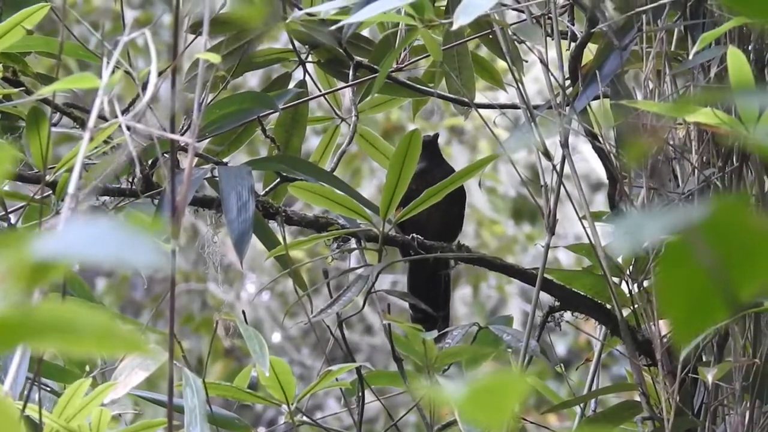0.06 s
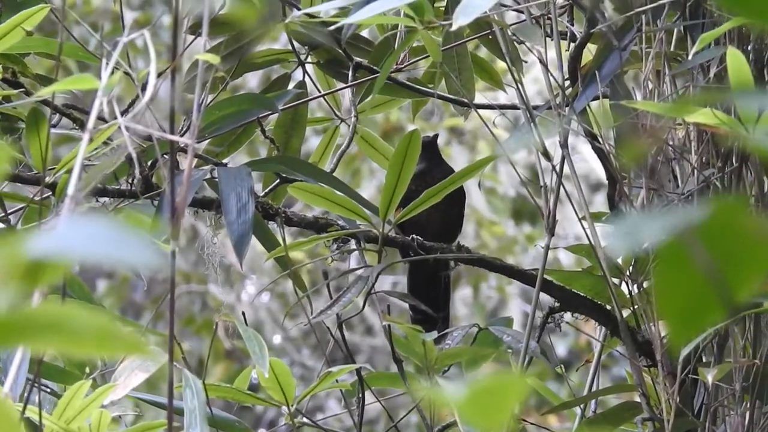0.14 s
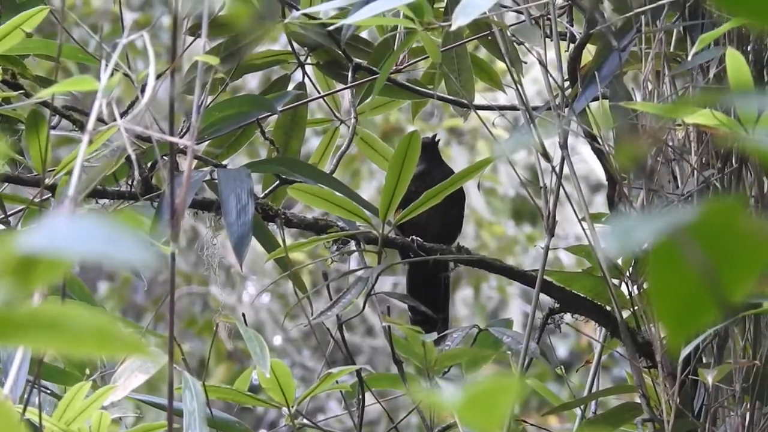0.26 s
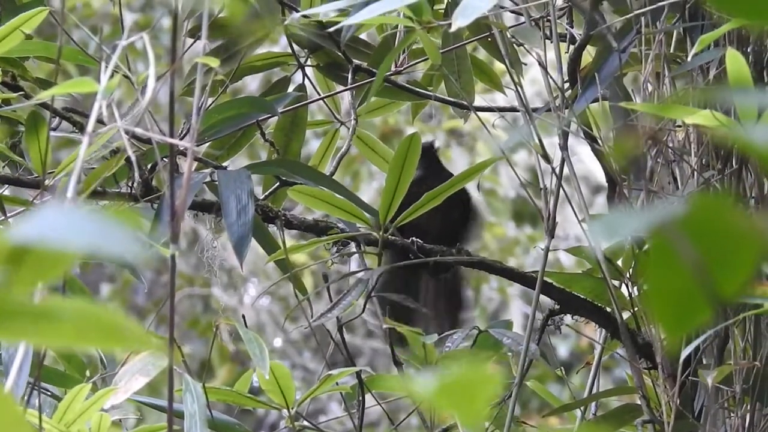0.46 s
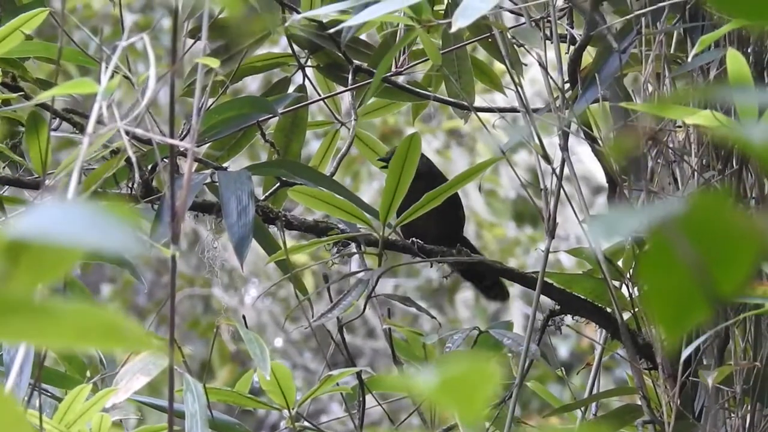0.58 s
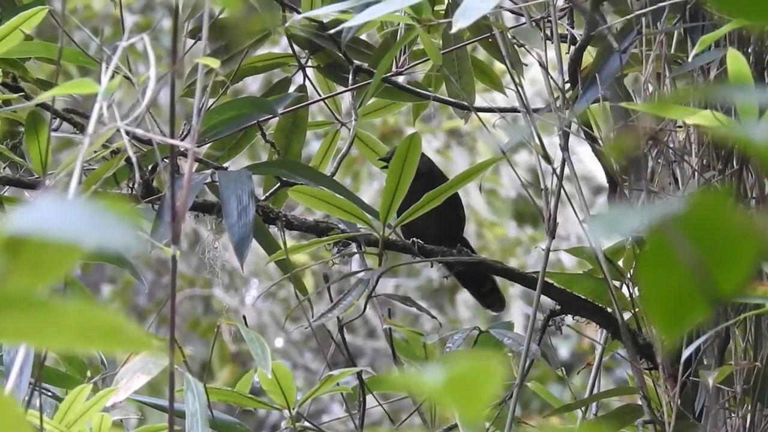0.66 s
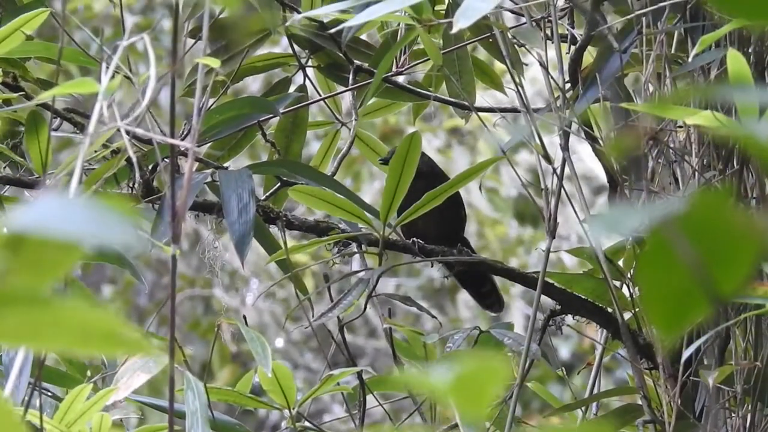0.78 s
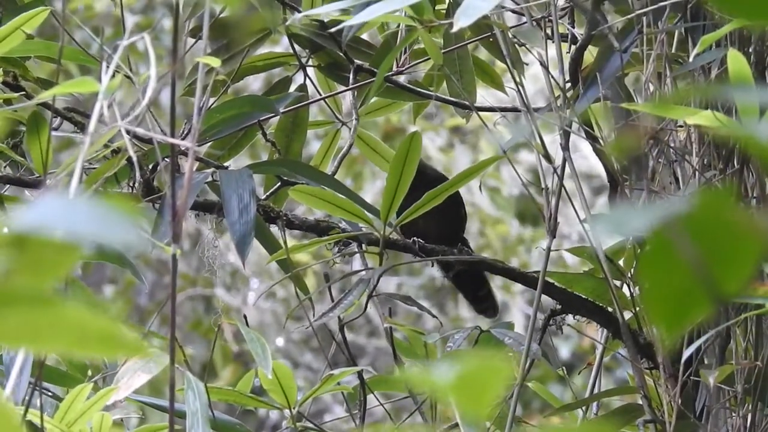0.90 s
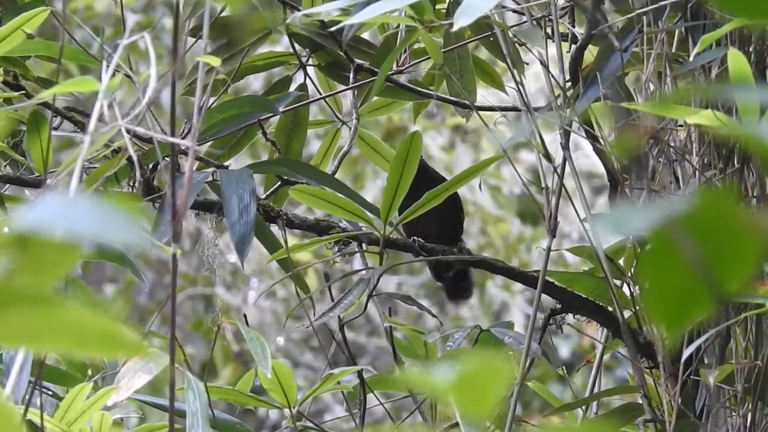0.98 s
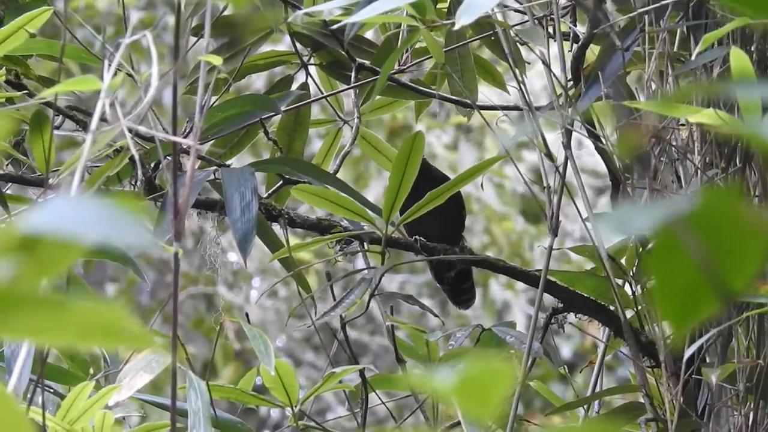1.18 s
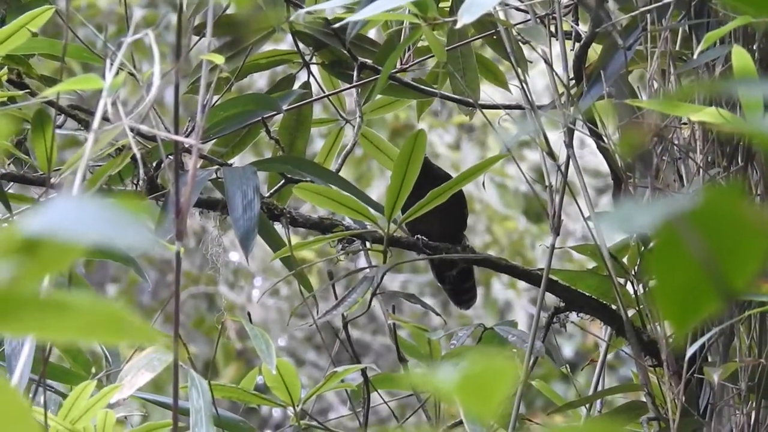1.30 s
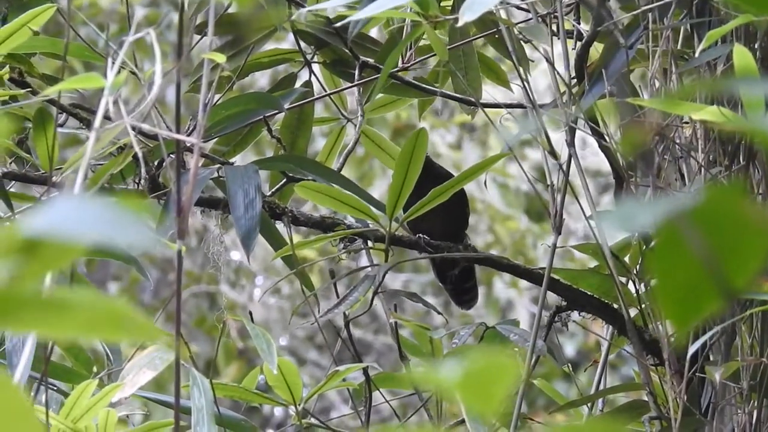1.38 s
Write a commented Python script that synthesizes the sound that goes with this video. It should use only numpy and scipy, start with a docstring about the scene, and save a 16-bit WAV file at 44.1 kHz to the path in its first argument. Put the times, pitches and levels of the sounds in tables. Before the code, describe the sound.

A bird scolds with harsh, buzzy, rattling rasps of uneven length in echoing dense forest

```python
"""Dense forest: a laughingthrush scolds from a branch. Each rasp is two whistles, one from each side of the
syrinx, swept up and down nearly eighty times a second; the upper one flares as it crosses the throat resonance.
Soft hoarse slurs, also sines on pitch curves, fall between some rasps. Decaying noise echoes scatter the calls
off leaves and trees. Shaped noise makes a faint hiss, a low rumble and thin high air."""
import sys
import numpy as np
from scipy import signal
from scipy.fft import rfft, irfft
from scipy.io import wavfile

SR = 44100
rng = np.random.default_rng(int(sys.argv[2]) if len(sys.argv) > 2 else 0)


def to_wav(s):
    """Save 16-bit WAV."""
    ch = np.atleast_2d(s).T  # columns
    pcm = np.round(np.clip(ch, -1, 1) * 32767)  # PCM
    wavfile.write(sys.argv[1], SR, pcm.astype(np.int16))


N = 63945
LEAD_S = 0.2   # run-in ahead of time 0, trimmed in scene()
LEAD = int(LEAD_S * SR)
TIME_S = np.arange(-LEAD, N) / SR


def from_db(db):
    """Decibels to amplitude gain."""
    return 10 ** (np.asarray(db) / 20)


def at_hz(points, hz):
    """Read a spectrum in dB, interpolated on a log-frequency axis."""
    point_hz, point_db = np.transpose(points)
    return np.interp(np.log(np.maximum(hz, 1)), np.log(point_hz), point_db)


ROUGH_HZ, LEVEL_ROUGH_DB = 900, 1.3
WANDER_HZ, WANDER_PITCH, WANDER_DB = 60, 0.018, 0.9   # WANDER_PITCH: fraction of pitch


def flutter(rate_hz):
    """Random unsteadiness of the syrinx: low-passed noise, standard deviation 1."""
    lowpass = signal.butter(2, rate_hz, fs=SR, output="sos")
    y = signal.sosfilt(lowpass, rng.standard_normal(len(TIME_S)))
    return y / y.std()


def whistle(hz, rough):
    """A sine on a pitch curve, with fast roughness and slower wander in pitch and level."""
    unsteady_hz = hz * (1 + rough * flutter(ROUGH_HZ) + WANDER_PITCH * flutter(WANDER_HZ))
    phase = 2 * np.pi * np.cumsum(unsteady_hz) / SR
    level_db = LEVEL_ROUGH_DB * flutter(ROUGH_HZ) + WANDER_DB * flutter(WANDER_HZ)
    return np.sin(phase) * from_db(level_db)


EDGE_S = 0.00085


def gate(start_s, end_s):
    """Open between two times, with short sine-squared edges."""
    to_edge_s = np.minimum(TIME_S - start_s, end_s - TIME_S)
    return np.sin(np.pi / 2 * np.clip(to_edge_s / EDGE_S, 0, 1)) ** 2


SWEEP_S = 0.0129
RISE_SKEW = 0.35   # each sweep rises faster than it falls


def swing(t_s, first_s, last_s, slowing_sweeps):
    """Sweep cycle of the syrinx: 0 at each pitch dip, 1 at each crest."""
    along = (t_s - first_s) / (last_s - first_s)
    sweeps = np.round((last_s - first_s) / SWEEP_S)
    turn = 2 * np.pi * (sweeps * along + slowing_sweeps * (1 - (2 * along - 1) ** 2))
    return (1 - np.cos(turn + RISE_SKEW * (1 - np.cos(turn)))) / 2


UPPER_DIP_HZ, OPENING_DIP_HZ, OPENING_S = 4850, 5450, 0.01151
UPPER_TOP_HZ, SOFT_TOP_HZ = 9200, 7925   # soft: before the rasp has swelled
UPPER_ROUGH = 0.016   # fraction of pitch

# Gain of the upper whistle through the throat: (distance from resonance [octaves], gain [dB])
THROAT_GAIN = [(-.45, -8), (-.25, -42), (-.11, -2.5), (0, -1.5), (0.089, -1.5), (.2, -25.5), (.4, -20.5),
               (.62, -25), (.75, -37)]


def upper_whistle(height, since_first_s, softness, throat_hz):
    """Upper side of the syrinx: the throat resonance turns its sweeps into level flares."""
    opening = np.exp(-(np.maximum(since_first_s, 0) / OPENING_S) ** 2)
    dip_hz = UPPER_DIP_HZ + (OPENING_DIP_HZ - UPPER_DIP_HZ) * opening
    top_hz = UPPER_TOP_HZ + (SOFT_TOP_HZ - UPPER_TOP_HZ) * softness
    hz = dip_hz * (top_hz / dip_hz) ** height
    gain_db = np.interp(np.log2(hz / throat_hz), *np.transpose(THROAT_GAIN))
    return whistle(hz, UPPER_ROUGH) * from_db(gain_db)


LOWER_DIP_HZ, LOWER_TOP_HZ, LOWER_DB = 2450, 5200, -12
LOWER_LAG_S = 0.000803   # behind the upper whistle
LOWER_SHAPE = 0.85   # below 1: sharper turns at the dips
LOWER_ROUGH = 0.032   # fraction of pitch
LEAD_IN_DB, LEAD_IN_FADE_DB = 3, 10.5   # first sweep, fading as it climbs
ACCENT_AT_S, ACCENT_WIDTH_S, ACCENT_SHARPNESS = 0.0062, 0.0022, 4

# Gain of the lower whistle: (frequency [Hz], gain [dB])
LOWER_GAIN = [(2200, -11.5), (2500, -13.5), (3100, 1.5), (3800, -5.5), (4500, -3), (5200, -5)]


def lower_whistle(lagged_swing, since_first_s, accent_db):
    """Lower side of the syrinx: level follows its pitch, and the rasp's first crest is accented."""
    height = lagged_swing ** LOWER_SHAPE
    hz = LOWER_DIP_HZ + (LOWER_TOP_HZ - LOWER_DIP_HZ) * height
    lead_in_db = (LEAD_IN_DB - LEAD_IN_FADE_DB * height) * (since_first_s < -SWEEP_S / 4)
    accent_window = np.exp(-((since_first_s - ACCENT_AT_S) / ACCENT_WIDTH_S) ** 2)
    crest_db = accent_db * height ** ACCENT_SHARPNESS * accent_window
    return whistle(hz, LOWER_ROUGH) * from_db(LOWER_DB + at_hz(LOWER_GAIN, hz) + lead_in_db + crest_db)


# Rasps: (first pitch dip [s], last pitch dip [s], overhang after it [s], slowing [sweeps],
#         throat resonance [Hz], level [dB], swell time [s], swell depth [dB], opening accent [dB])
RASP_CALLS = [(-.095, -0.031, 0.0011, 0.0038, 5920, -14.5, .02, -2.5, -5),
              (0.3276, 0.4781, 0.004, .16, 5940, -12, .085, 14, 9.5),
              (0.5277, .5422, 0.0011, 0.00063, 5850, -10, .01, 1, 8),
              (0.5849, 0.5961, 0.0023, 0.0029, 5910, -10, .01, 1.5, 10.5),
              (0.6851, .762, 0.00044, 0.022, 5757, -15, 0.013, 1, 16.5),
              (0.9046, 1.0455, 0.00064, 0.02, 5770, -13.5, 0.1, 9.5, 14),
              (1.130, 1.21, 0.00024, 0, 5690, -15.5, 0.027, 2, 16.5)]


def rasp(first_s, last_s, overhang_s, slowing_sweeps, throat_hz, level_db, swell_s, swell_db, accent_db):
    """Both sides of the syrinx swing over about an octave; the lower starts about one sweep early."""
    since_first_s = TIME_S - first_s
    softness = np.clip(1 - since_first_s / swell_s, 0, 1)
    height = swing(TIME_S, first_s, last_s, slowing_sweeps)
    lagged_swing = swing(TIME_S - LOWER_LAG_S, first_s, last_s, slowing_sweeps)
    end_s = last_s + overhang_s
    upper = upper_whistle(height, since_first_s, softness, throat_hz) * gate(first_s - 0.004, end_s)
    lower = lower_whistle(lagged_swing, since_first_s, accent_db) * gate(first_s - 0.015, end_s - 0.002)
    return from_db(level_db - swell_db * softness) * (upper + lower)


NOTE_ROUGH = 0.07   # fraction of pitch

# Soft slurs: (start [s], length [s], start pitch [Hz], middle pitch [Hz], end pitch [Hz], level [dB])
SLURS = [(0.189, 0.0027, 3170, 2450, 3700, -31.5), (.196, 0.02, 3847, 4600, 4210, -35),
         (.198, 0.019, 7010, 5900, 6500, -31), (.208, 0.0089, 3350, 2450, 4370, -41),
         (.217, 0.02, 7380, 6200, 7100, -26), (.223, 0.0135, 8950, 6700, 5450, -38),
         (.223, .010, 5410, 4287, 3300, -31.5), (.884, 0.0069, 5880, 6430, 7500, -29.5)]


def note(start_s, length_s, start_hz, middle_hz, end_hz, level_db):
    """One soft, hoarse slur: a rough whistle on a parabola through three pitches."""
    along = np.clip((TIME_S - start_s) / length_s, 0, 1)
    parabola = np.polyfit([0, 0.5, 1], [start_hz, middle_hz, end_hz], 2)
    hz = np.polyval(parabola, along)
    return from_db(level_db) * gate(start_s, start_s + length_s) * whistle(hz, NOTE_ROUGH)


VOICE_BAND_HZ = (2200, 9500)


def voice_band(x):
    """Band-pass to the range the bird radiates."""
    return signal.sosfilt(signal.butter(9, VOICE_BAND_HZ, "band", fs=SR, output="sos"), x)


OCTAVE_DB = -48


def with_octave(x):
    """Add a faint second harmonic: same envelope, doubled phase."""
    z = signal.hilbert(x)
    return x + from_db(OCTAVE_DB) * np.abs(z) * np.cos(2 * np.angle(z))


def coloured(x, points):
    """Shape noise by a spectrum; rms 1."""
    hz = np.fft.rfftfreq(x.shape[-1], 1 / SR)
    y = irfft(rfft(x) * from_db(at_hz(points, hz)), x.shape[-1])
    return y / y.std()


def stereo_noise(size, likeness):
    """White noise; likeness is the correlation between the two channels."""
    mid, side = rng.standard_normal((2, size))
    c = np.clip(likeness, 0, 1)
    return (np.sqrt(1 + c) * mid + np.sqrt(1 - c) * side * np.array([[1], [-1]])) / np.sqrt(2)


LEAF_DB, LEAF_T60_S, LEAF_DELAY_S, LEAF_LIKENESS = -3.5, 0.14, 0.003, 0.7


def leaf_echo(t_s):
    """Quick scatter from nearby leaves: delayed noise, decaying exponentially."""
    decay = from_db(-60 * t_s / LEAF_T60_S)
    return stereo_noise(len(t_s), LEAF_LIKENESS) * decay * (t_s > LEAF_DELAY_S)


FOREST_DB, FOREST_T60_S, FOREST_BUILD_S, FOREST_LIKENESS = -5.5, 0.61, 0.0062, 0.35

# Colour of the trees' tail: (frequency [Hz], relative level [dB])
TREE_COLOUR = [(2000, -4.5), (3200, -5.5), (4400, 8.5), (5800, -3), (7000, 5.5), (9000, 1.5)]


def tree_echo(t_s):
    """Longer, wider tail from the trees: coloured noise that builds up, then decays."""
    decay = from_db(-60 * t_s / FOREST_T60_S)
    build = 1 - np.exp(-t_s / FOREST_BUILD_S)
    return coloured(stereo_noise(len(t_s), FOREST_LIKENESS), TREE_COLOUR) * decay * build


def forest(call):
    """Convolve the call with both echoes, each set to its level by energy per channel."""
    t_s = np.arange(SR) / SR
    echoes = 0
    for db, echo in ((LEAF_DB, leaf_echo(t_s)), (FOREST_DB, tree_echo(t_s))):
        echoes = echoes + from_db(db) * echo / np.sqrt(np.sum(echo ** 2) / 2)
    return signal.fftconvolve(call[None], echoes, axes=1)[:, :len(call)]


HISS_DB, RUMBLE_DB, AIR_DB, BACKGROUND_LIKENESS = 6, -52, -56, 0.62   # HISS_DB: offset on its level curve

# Hiss level before offset: (time [s], level [dB])
HISS_CURVE = [(0.0, -63), (0.028, -54.5), (0.164, -54), (0.218, -62.5), (0.302, -55), (0.322, -59.5),
              (0.584, -63.5), (0.868, -56), (1.264, -60.5), (1.288, -54.5), (1.44, -55), (1.45, -62)]
# Noise spectra: (frequency [Hz], relative density [dB per Hz])
HISS_COLOUR = [(150, -8.5), (300, 0), (600, -3), (1200, -6.5), (2000, -8), (4500, -7), (7000, -9.5),
               (10000, -46), (15000, -47)]
RUMBLE_COLOUR = [(20, -44), (40, -21), (65, -4.5), (110, -1.5), (170, 0), (240, -8.5), (350, -35),
                 (800, -35.5)]
AIR_COLOUR = [(1000, -4), (6000, 28), (13000, -5), (15500, -15)]


def background():
    """Shaped noise: a hiss that rises and sinks on a set curve, a steady low rumble and thin high air."""
    hiss_db = HISS_DB + np.interp(np.arange(N) / SR, *np.transpose(HISS_CURVE))
    layers = ((hiss_db, HISS_COLOUR), (RUMBLE_DB, RUMBLE_COLOUR), (AIR_DB, AIR_COLOUR))
    return sum(from_db(db) * coloured(stereo_noise(N, BACKGROUND_LIKENESS), colour) for db, colour in layers)


NOTE_DIRECT_DB = -5
BIRD_PAN_DB = 0.8   # left up, right down


def scene():
    """The bird, just left of centre, in its forest; its soft notes arrive mostly as scatter."""
    rasps = with_octave(voice_band(sum(rasp(*row) for row in RASP_CALLS)))
    notes = voice_band(sum(note(*row) for row in SLURS))
    bird = rasps + from_db(NOTE_DIRECT_DB) * notes + forest(rasps + notes)
    return bird[:, LEAD:] * from_db([[BIRD_PAN_DB], [-BIRD_PAN_DB]]) + background()


CUTOFF_HZ = 15200


def record(dry):
    """Cut the top steeply with an elliptic low-pass."""
    return signal.sosfilt(signal.ellip(10, 0.1, 80, CUTOFF_HZ, fs=SR, output="sos"), dry)


dry = scene()
out = record(dry)
to_wav(out)
```